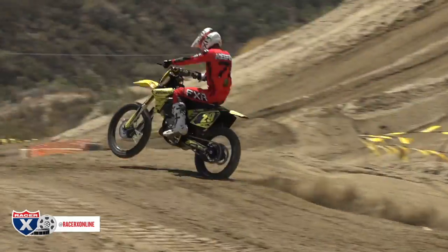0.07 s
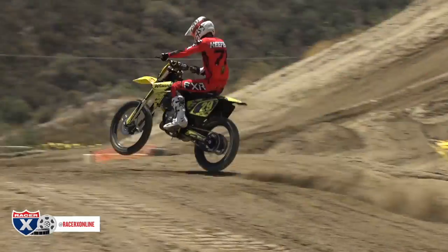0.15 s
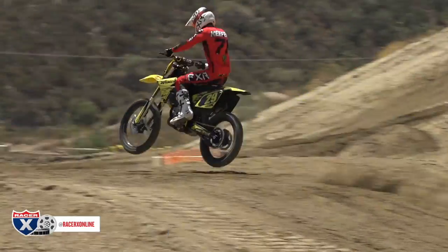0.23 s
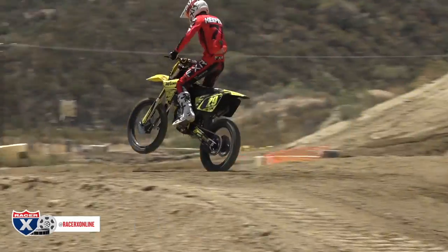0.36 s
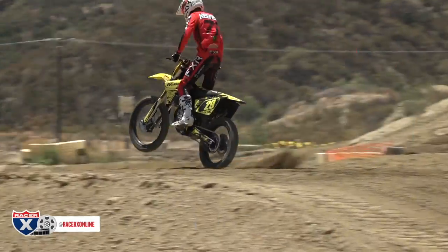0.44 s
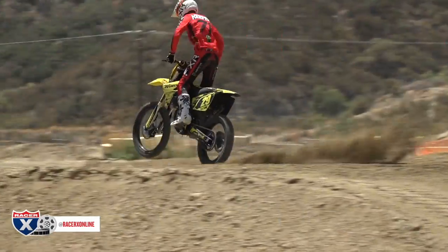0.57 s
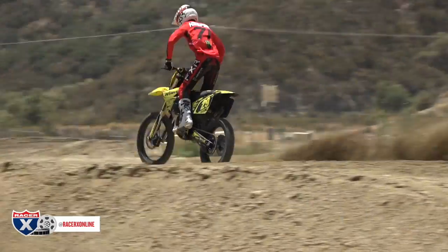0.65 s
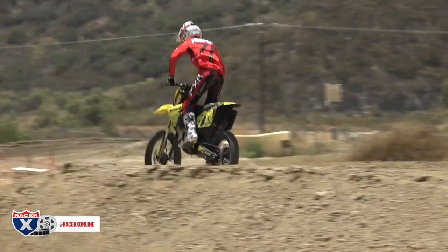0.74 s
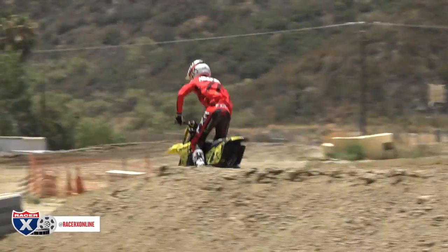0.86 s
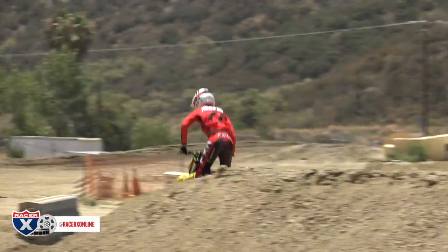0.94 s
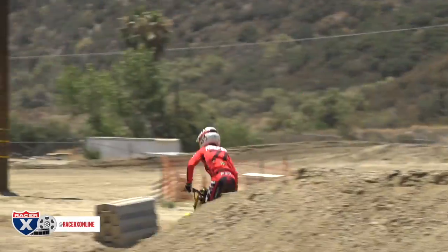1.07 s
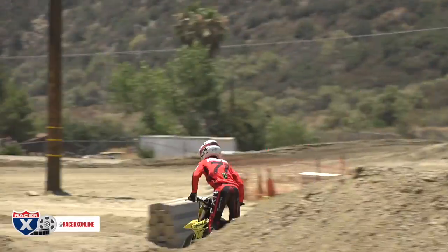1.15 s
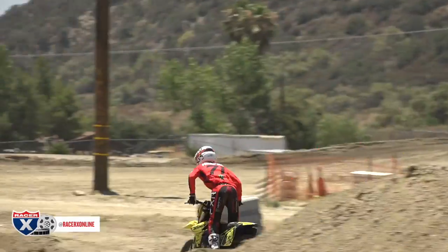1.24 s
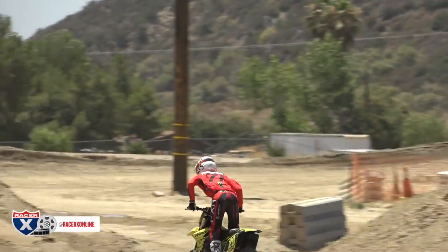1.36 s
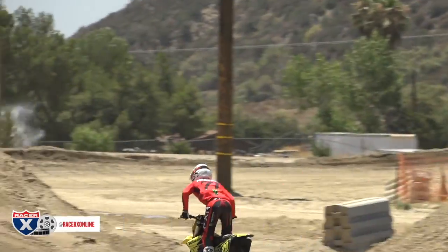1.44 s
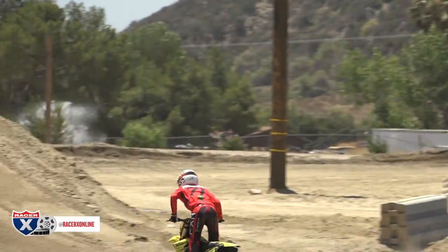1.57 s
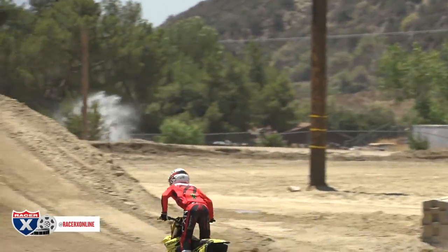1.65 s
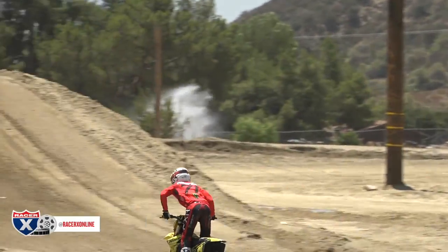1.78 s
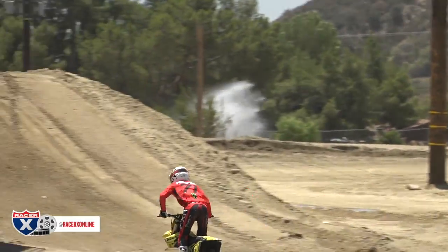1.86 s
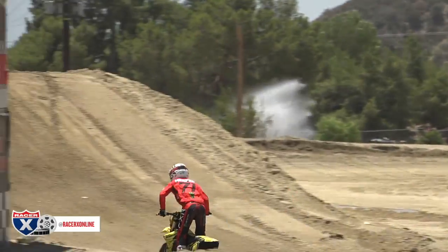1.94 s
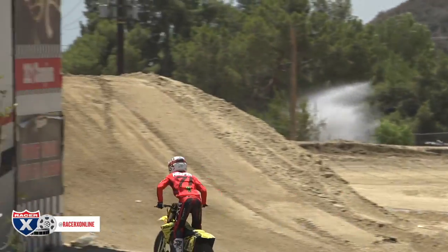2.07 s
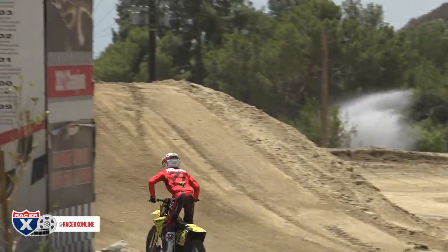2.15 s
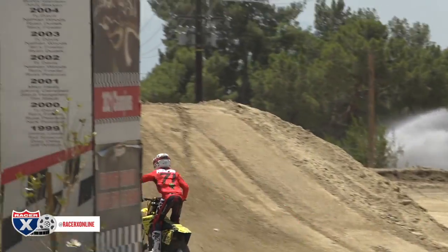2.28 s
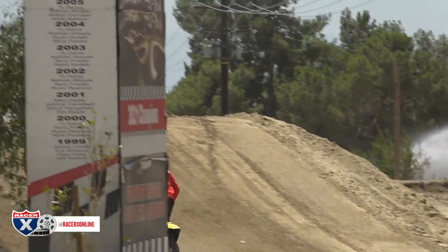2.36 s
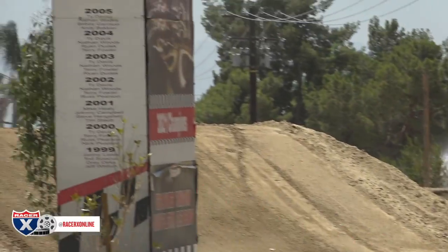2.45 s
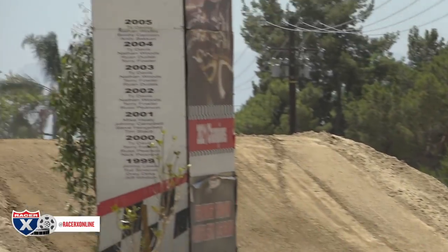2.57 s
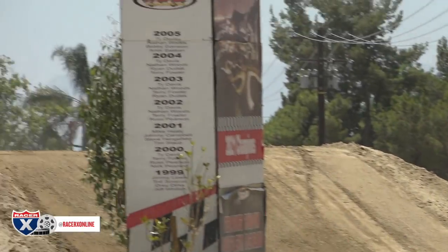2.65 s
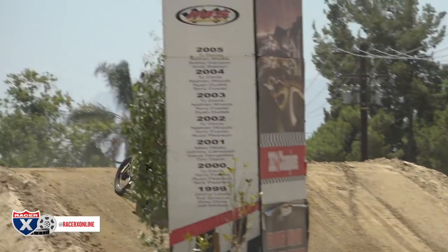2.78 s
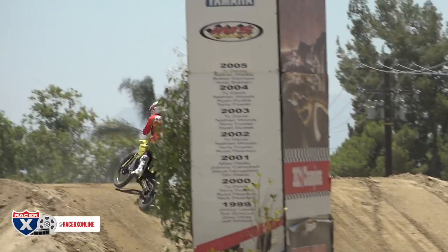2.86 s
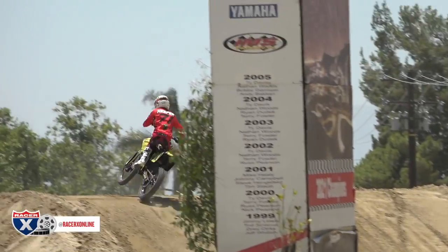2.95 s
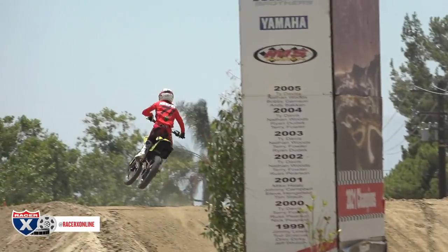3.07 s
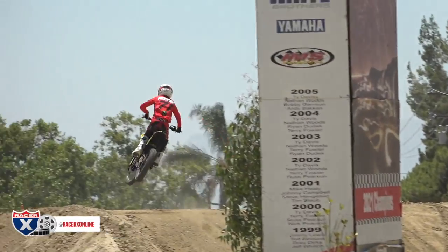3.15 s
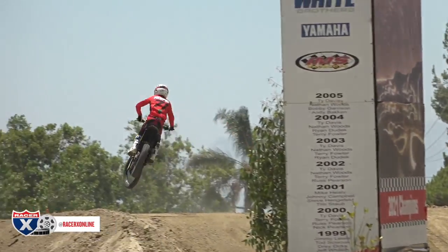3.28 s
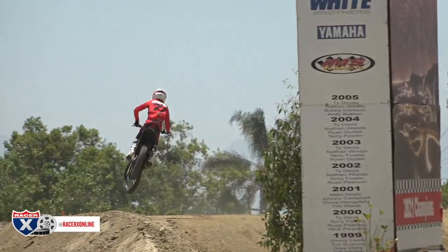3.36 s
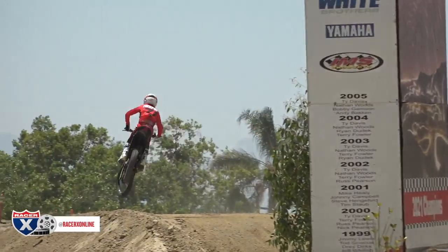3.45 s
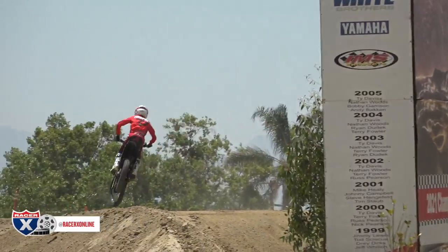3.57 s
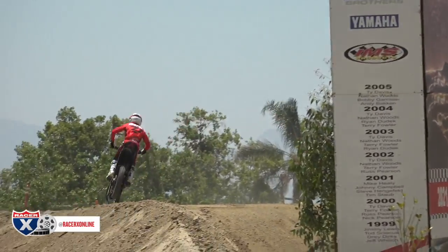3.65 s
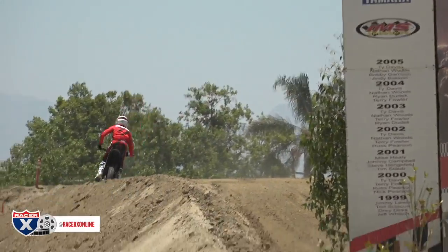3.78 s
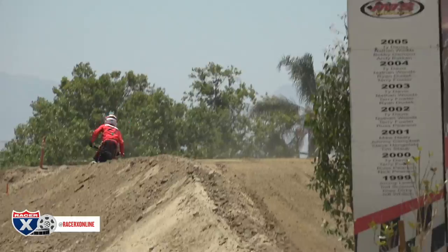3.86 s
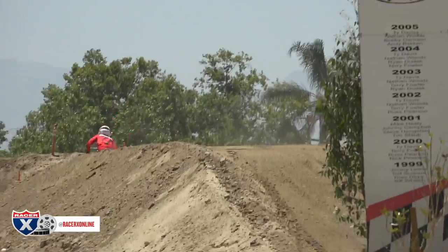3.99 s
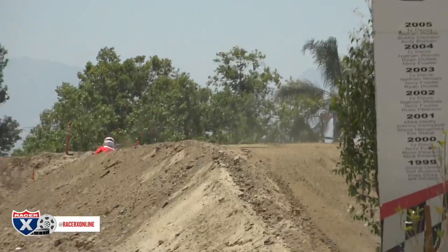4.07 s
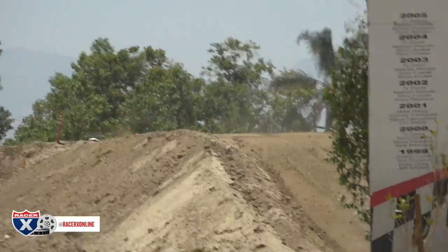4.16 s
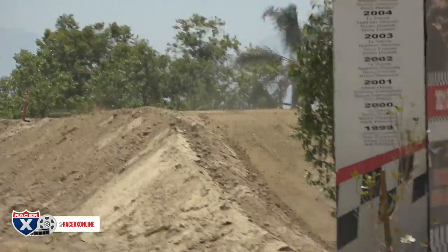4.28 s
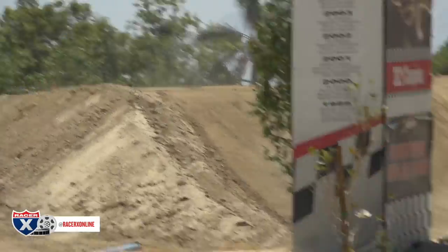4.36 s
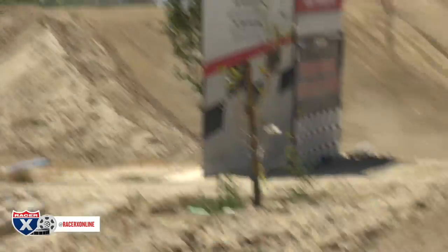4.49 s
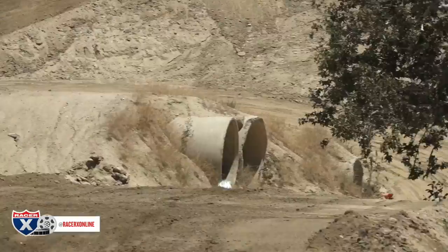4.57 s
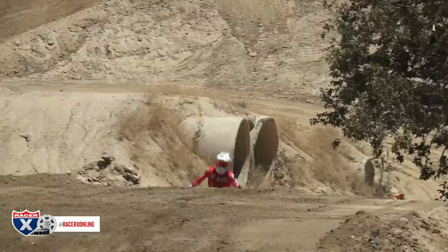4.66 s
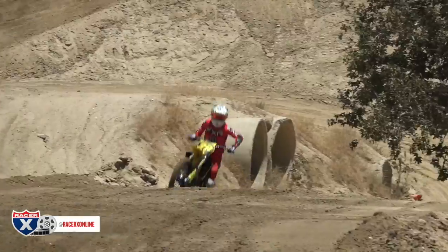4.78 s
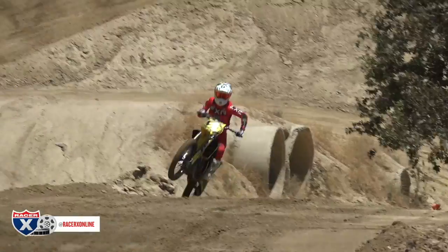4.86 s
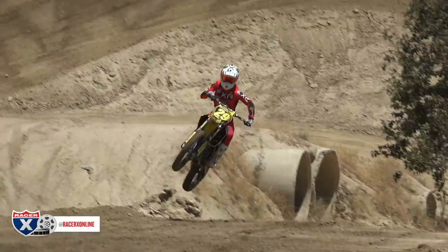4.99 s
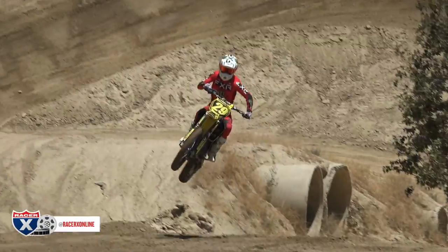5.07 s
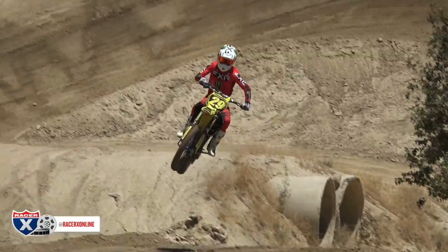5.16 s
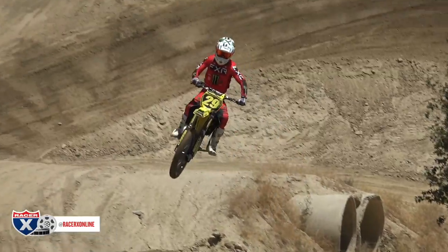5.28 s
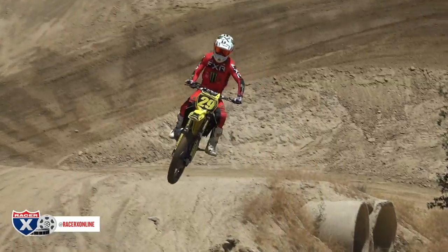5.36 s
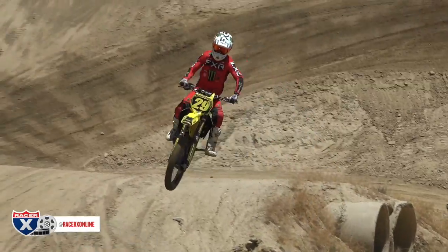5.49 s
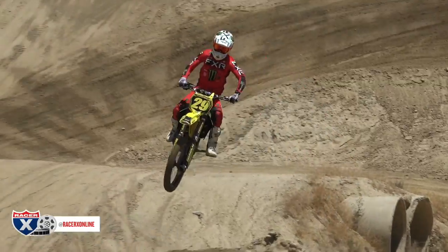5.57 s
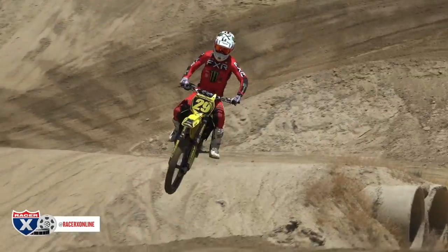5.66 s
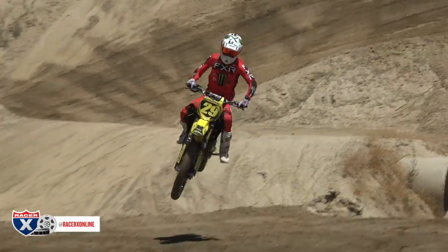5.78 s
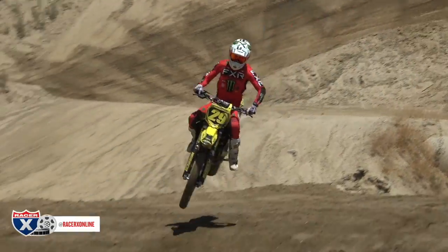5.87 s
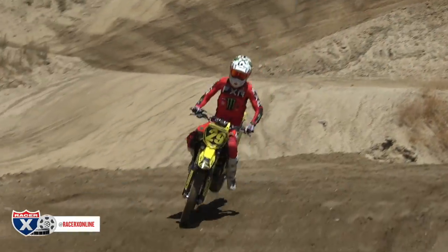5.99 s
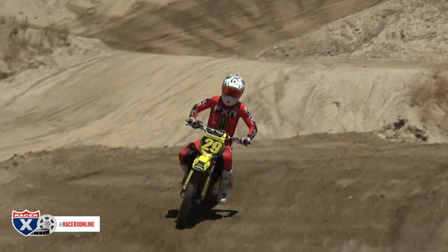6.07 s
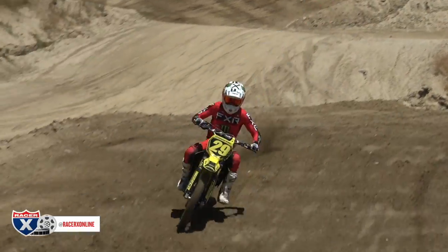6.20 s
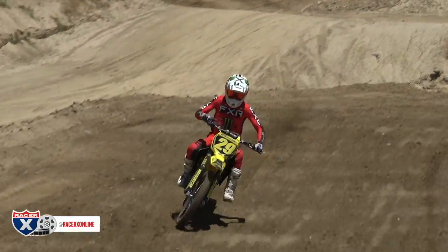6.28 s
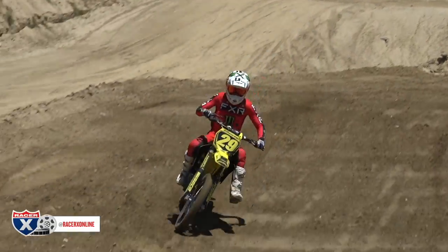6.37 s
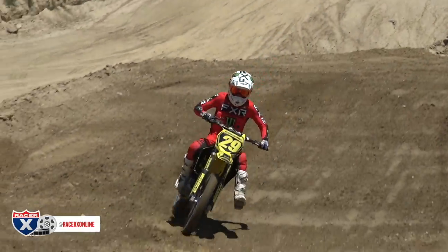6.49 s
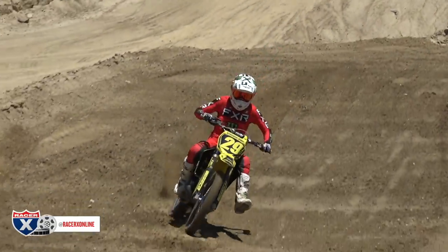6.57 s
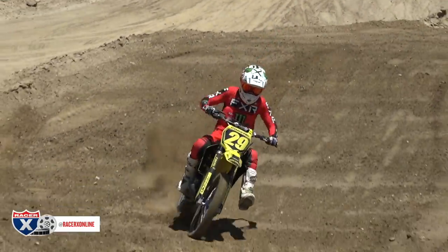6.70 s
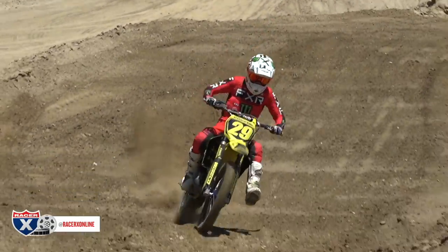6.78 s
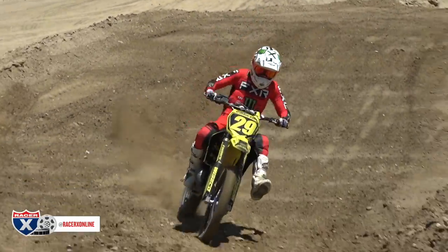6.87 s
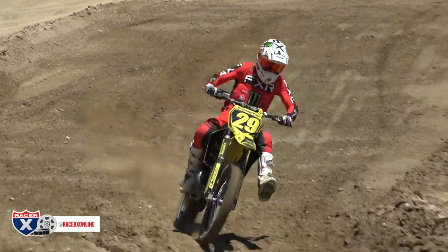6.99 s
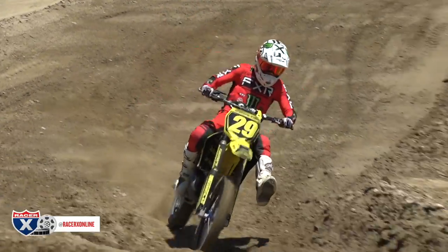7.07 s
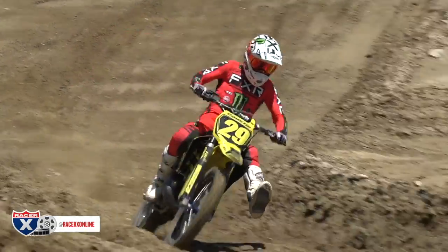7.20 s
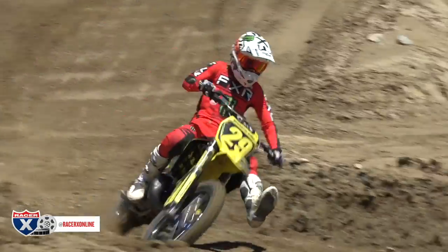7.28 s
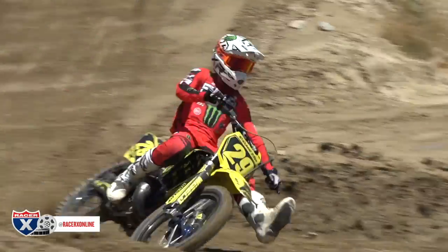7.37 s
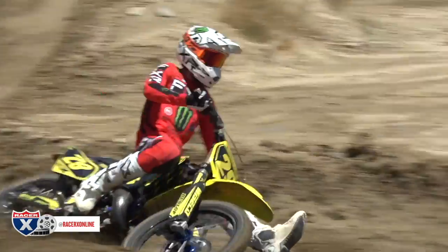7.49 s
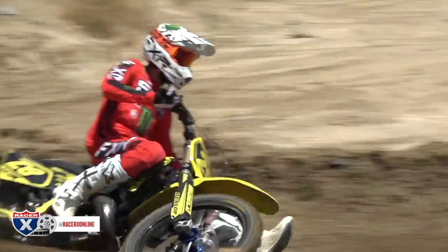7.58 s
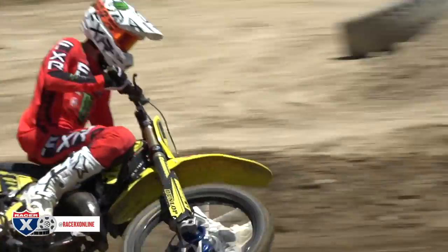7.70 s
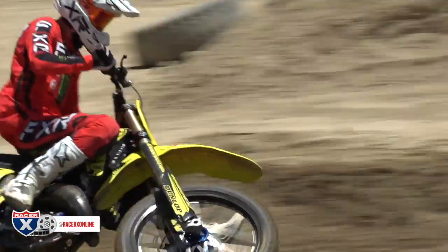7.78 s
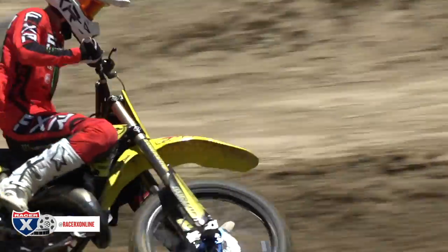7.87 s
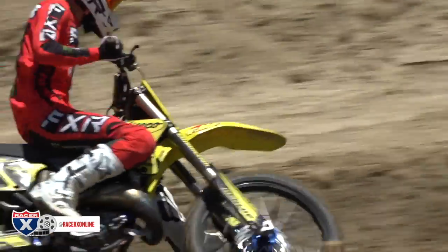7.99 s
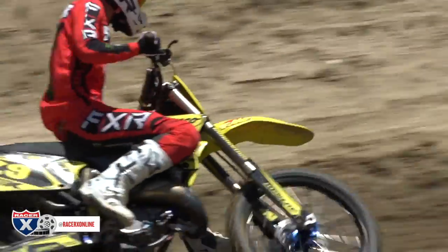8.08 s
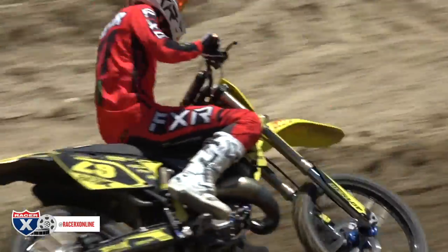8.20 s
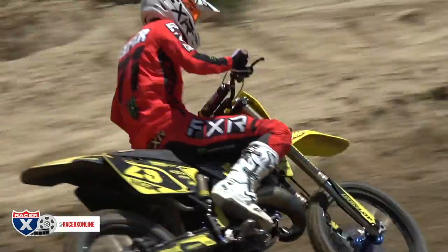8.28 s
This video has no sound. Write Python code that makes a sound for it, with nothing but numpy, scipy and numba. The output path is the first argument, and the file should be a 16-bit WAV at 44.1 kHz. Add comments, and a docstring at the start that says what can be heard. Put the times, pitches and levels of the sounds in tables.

```python
"""A two-stroke dirt bike buzzes loudly, heard from behind as it jumps away over an open track. Then, from
a second spot, it comes down into a near corner. Each firing of its one cylinder sends a thump and a sharp
crack out of the pipe: the thumps blend into a note, the cracks into a rasp. The cracks also bounce off
the ground. Cooling fins and air intake hiss, dirt banks and a hillside echo, and a light wind blows."""
import sys
import numpy as np
from scipy import signal
from scipy.io import wavfile
from scipy.ndimage import uniform_filter1d
from numba import njit

SR = 44100
rng = np.random.default_rng(int(sys.argv[2]) if len(sys.argv) > 2 else 0)


def wav_out(sig):
    """Save sig, one row per channel (or a flat mono array), as 16-bit PCM at SR to the path in sys.argv[1]."""
    wavfile.write(sys.argv[1], SR, np.round(np.clip(np.atleast_2d(sig).T, -1, 1) * 32767).astype(np.int16))


N = 367794

# The tone of the wind. Each row: frequency in Hz, relative strength in dB.
WIND_TONE = [(30, -23), (45, 8.5), (95, -1), (140, -4), (300, -12), (1400, -10)]
# Gusts on the microphone. Each row: time in seconds, boost of the low wind in dB.
GUSTS = [(0, 3), (3.2, 0), (4.5, 5.5), (4.6, -5.5), (6.3, -2), (7.7, 6), (8.2, -9)]
# Echoes off dirt banks. Each row: delay in milliseconds, gain in dB.
BANK_ECHOES = [(23, -19), (46, -21)]
# The echo off the hillside. Each row: time in seconds, delay in milliseconds, gain in dB.
HILL_ECHO = [(0, 98, -27.5), (3.5, 108, -14), (4.1, 108, -5.5), (4.56, 107, -8), (4.6, 83, -17),
             (5.5, 60, -16), (6.3, 55, -12), (7.3, 40, -18)]
# Engine speed, one list for each stretch of the ride. Each row: time in seconds, firings per second.
REVS = [
    [(0.0, 156.4), (0.08, 162.5), (0.1, 149.2), (0.13, 148.2), (0.2, 181), (0.25, 150.5), (0.33, 141.4),
     (0.39, 178.3), (0.47, 199.3), (0.52, 209.4), (0.58, 170.8), (0.66, 189.5), (0.81, 174), (0.86, 171.5),
     (0.91, 195.6), (.938, 202.7), (.956, 193), (1.05, 215.4), (1.11, 219.6), (1.16, 163), (1.21, 176.7),
     (1.345, 181), (1.37, 189.8), (1.46, 192.3), (1.5, 205.4), (1.55, 191.2), (1.64, 202), (1.75, 189.7),
     (1.92, 199)],
    [(1.97, 195.8), (2.078, 200.6), (2.268, 192.7), (2.496, 199.7), (2.548, 193.6), (2.634, 202),
     (2.688, 189.1), (2.758, 202.9), (2.798, 188.7), (2.828, 200.6), (2.914, 188), (2.946, 201.2),
     (3.004, 173.4), (3.042, 168.9), (3.2, 160)],
    [(3.25, 157.1), (3.52, 150.8), (3.61, 164.5), (3.65, 183.9), (3.71, 202), (3.85, 213.5), (4.04, 185.5),
     (4.12, 204), (4.16, 182), (4.27, 185.8), (4.4, 196.4), (4.57, 192.9)],
    [(4.58, 207.2), (4.795, 206.1), (4.825, 188.2), (4.96, 186.3), (4.99, 166.4), (5.48, 137.8),
     (5.51, 142.7), (5.6, 216), (5.64, 224.3), (5.69, 183.5), (5.72, 179.6), (5.745, 189.4), (5.78, 190),
     (5.81, 176), (6.07, 163.5), (6.105, 184.2), (6.125, 180.7), (6.18, 207), (6.2, 177), (6.232, 189),
     (6.26, 174.8), (6.33, 172.1), (6.58, 214.5), (6.63, 178.5), (6.83, 156), (6.9, 187.3), (6.97, 147.2),
     (7.03, 136.1), (7.2, 147), (7.26, 167), (7.33, 168.2), (7.42, 216.2), (7.53, 238), (7.565, 231)],
    [(7.6, 186), (7.628, 143.6), (7.652, 125.6), (7.708, 109.1), (7.858, 100.1), (7.982, 116),
     (8.088, 186.1), (8.114, 191.7), (8.192, 149), (8.302, 143.8), (8.34, 156.4)],
]
# How the bike sounds from place to place. Each row: time in seconds, rasp and note levels in dB with the
# throttle shut, overtones against the note in dB, gain above 7 kHz in dB, ground delay in milliseconds.
PLACES = [(0, -45.5, -38.5, -12.5, 1, 0.67), (1.05, -63.5, -50, -6.5, -6.5, 0.57),
          (1.13, -65, -47, -16.5, -4, 1.64), (2.7, -66, -41, -13, -2.5, 2.44),
          (3.0, -63.5, -48, -13, -2, 2.3), (3.45, -63.5, -61, -1.5, -7.5, 1.69),
          (3.95, -73, -59.5, -6, -7.5, 1.38), (4.56, -61, -13, -11.5, -9, 1.45),
          (4.58, -68, -63, -25.5, -33, 0.39), (5.0, -63.5, -60.5, -4.5, -2, 0.33),
          (5.2, -52.5, -63.5, 4, -0.5, 0.45), (5.45, -55, -53.5, -11, 0, 0.44),
          (5.75, -51.5, -48, -6, -2.5, 0.612), (6.63, -46, -40.5, -16, 3, 0.67),
          (6.96, -44.5, -48, -8, -0.5, 0.88), (7.25, -40.5, -42, -9.5, 4.5, 1.03),
          (7.8, -36.5, -33.5, -11.5, 1.5, 0.98), (8.04, -37, -33, -3.5, 2, 1.18),
          (8.34, -40, -31, -5, 4, 1.36)]
# Twists of the throttle. Each row: start and end in seconds, base levels of rasp and note in dB,
# swell over the twist in dB (rasp and note each take a share of it).
TWISTS = [(0, 0.219, -34.5, -34.5, 5.5), (0.338, 0.53, -30, -32.5, -14.5), (0.528, 0.6, -37.5, -39.5, 12),
          (0.593, 0.701, -36.5, -37, 3), (0.845, 1.056, -40.5, -38, -19.5), (1.14, 1.47, -55, -39.5, -8),
          (1.438, 2.15, -57.5, -42, -2), (2.108, 2.4, -66, -44.5, 3.5), (2.366, 2.659, -56.5, -41, -13),
          (2.714, 2.885, -62, -43.5, 3.5), (3.549, 3.8, -53, -49, 8), (3.761, 3.87, -52, -52, -19),
          (4.038, 4.28, -63, -48, -2), (4.241, 4.565, -66, -50, -11), (4.576, 4.805, -65, -55.5, -1),
          (5.501, 5.675, -43.5, -42, -16.5), (6.075, 6.24, -43, -36.5, 0.5),
          (6.214, 6.603, -37, -36.5, -3.5), (6.671, 6.923, -35, -38.5, -4),
          (7.194, 7.231, -30.5, -39.5, -4), (7.245, 7.285, -36, -38, 1.5), (7.325, 7.65, -34.5, -35.5, -9),
          (7.582, 7.765, -25.5, -31.5, -3), (7.861, 8.08, -27, -33.5, 1), (8.038, 8.343, -24, -25.5, 3.5)]
# How far the tail pipe faces us. Each row: time in seconds, the cracks' share of the rasp from 0 to 1.
FACING = [(0, .8), (2.85, .74), (3.0, .35), (3.5, .45), (3.65, .7), (4.25, .6), (4.36, .82), (4.56, .82),
          (4.58, .3), (5.2, .15), (6.0, .25), (7.3, .25), (7.4, .6), (7.54, .7), (7.58, .3), (7.65, .4),
          (7.8, .2), (8.0, .3), (8.12, .72)]
# Late firings off the throttle. Each row: start in seconds, count, base level in dB, step per pop in dB.
POPS = [(3.2658, 1, -40, 0), (3.2853, 3, -35, -2), (3.3824, 2, -46, 4), (3.4502, 4, -43, 1)]
# Ragged burns. Each row: start and end in seconds, level in dB, centre and width in Hz.
RAGGED_BURNS = [(7.57, 7.635, -31, 3150, 4505)]
# Resonances (frequencies that ring) of the tail pipe. Each row: centre and width in Hz, gain in dB.
TAIL_PIPE = [(3230, 2900, 5), (4960, 3020, 15.5), (7020, 7600, 15.5)]
# Resonances of the exhaust chamber's walls. Each row: centre and width in Hz, gain in dB.
CHAMBER_WALLS = [(2680, 200, -1), (3250, 130, 2.5), (3950, 300, -6)]
# The hiss of fins and intake. Each row: centre and width in Hz, gain in dB.
HISS_BANDS = [(2870, 4300, -19.5), (3590, 560, -12), (4230, 390, -11.5), (5750, 1050, -9.5),
              (7540, 4800, -13.5), (9330, 860, -13), (14300, 23000, -33)]
# The snarl, a broad boost that moves as the pipe swings.
# Each row: time in seconds, centre and width in Hz, boost in dB.
SNARL = [(0, 3560, 2570, 10), (.4, 3320, 3080, 7.5), (.62, 3177, 3000, 6.5), (1.5, 2788, 3017, 7.5),
         (2.6, 3073, 2491, 13), (2.9, 3008, 3015, 5.5), (3.5, 2605, 2489, 9.5), (3.75, 3262, 2980, 1.5),
         (4.3, 2798, 2495, 13), (4.44, 2900, 905, 22.5), (4.56, 2784, 1197, 18), (4.6, 3000, 2497, 3.5),
         (6.7, 3207, 2997, 0), (7.45, 3200, 2522, 0), (7.62, 3200, 2503, 4.5), (8.0, 3202, 2998, 3.5),
         (8.2, 3216, 3000, 10.5)]
# Resonances of pipe and silencer. Each row: centre and width in Hz, gain in dB from the front,
# gain in dB from behind, change in dB when the bike is alongside.
PIPE_RESONANCES = [(437, 289, -7.5, -10, -0.5), (572.6, 127, -9, 4.5, -39), (919.4, 107, -5.5, -20.5, 20),
                   (1250, 330, -6.5, 2, -11.5), (2180, 1030, -21.5, 4.5, -4.5)]
# Low harmonics (multiples of the firing rate) that ground and banks favour. Each row: time in seconds,
# an added second harmonic in dB against the first, boosts of the third and of the fourth in dB.
LOW_HARMONICS = [(0, -10, -2.5, -7), (.5, -14, 1.5, 5.5), (.8, -19, 0.5, -4), (1.1, -9.5, 11, 8),
                 (1.5, -10.5, 5, 2), (2.2, -11, 8.5, 0), (2.5, -11, -2, -9), (2.8, -17, -4, 4),
                 (3.0, -27, -15, -3.5), (3.5, -26, -5, 0), (4.1, -15, 5.5, 8), (4.3, -13, -6, 12.5),
                 (4.56, -9, -4, 11.5), (4.7, -14, 11.5, 11.5), (5.2, 1, -12, 2), (5.6, -17, 6.5, 1.5),
                 (6.0, -44, -6.5, 5), (6.5, -17.5, 5.5, -6.5), (7.2, -30, -10.5, -6), (7.5, -5.5, 3, 5.5),
                 (7.85, 5, 12, 3), (8.15, -17, 0.5, 8.5)]

TIME = np.arange(N) / SR


def undb(db):
    """Turn decibels into a factor to multiply by."""
    return 10 ** (np.asarray(db) / 20)


def curves(table):
    """Join a table's rows with straight lines: one curve for each column after the time."""
    times, *columns = np.vstack(table).T
    return [np.interp(TIME, np.maximum.accumulate(times), column) for column in columns]


def even(x, span_s=0.037):
    """Hold a sound's running average level at 1."""
    span = int(span_s * SR)
    return x / np.sqrt(uniform_filter1d(uniform_filter1d(x ** 2, span), span) + 1e-18)


@njit
def sweep(x, hz, width):
    """Keep the frequencies near a moving centre, sample by sample (a state-variable filter)."""
    out, band_state, low_state = np.empty(len(x)), 0., 0.
    for i in range(len(x)):
        tuning, damping = np.tan(np.pi * hz[i] / SR), width[i] / hz[i]
        band = (band_state + tuning * (x[i] - low_state)) / (1 + tuning * (tuning + damping))
        band_state = 2 * band - band_state
        low_state += 2 * tuning * band
        out[i] = damping * band
    return out


def band_pass(x, hz, width):
    """Keep one band of frequencies; its centre and width may be steady or moving."""
    return sweep(x, hz + np.zeros(N), width + np.zeros(N))


def wander(rate):
    """A smooth random curve, roughly -1 to 1, with `rate` new values a second."""
    hold = int(SR / rate)
    steps = np.repeat(rng.standard_normal(N // hold + 1), hold)
    return 1.3 * uniform_filter1d(uniform_filter1d(steps, hold), hold)[:N]


def ring(x, resonances, drift, waver_db, steep=True):
    """Pass a sound through resonances whose pitch drifts and whose level wavers."""
    out = 0
    for hz, width, db in resonances:
        centre = hz * (1 + drift * wander(4))
        band = band_pass(x, centre, width)
        if steep:
            band = band_pass(band, centre, 1.5 * width)
        out += undb(db + waver_db * wander(7.7)) * band
    return out


def wind(base_db=-62):
    """Moving air: bands of noise swell together and flicker alone; gusts lift the low ones."""
    tone_hz, tone_db = np.array(WIND_TONE).T
    gust_db, = curves(GUSTS)
    low, high, swell = 0, 0, wander(2.72)
    for hz in 30 * 2 ** np.arange(0, 5.6, .5):
        db = np.interp(np.log(hz), np.log(tone_hz), tone_db) + .5 * swell
        band = ring(rng.standard_normal(N), [(hz, hz / 2, db)], drift=.012, waver_db=3)
        if hz < 200:
            low += band
        else:
            high += band
    return undb(base_db) * (undb(gust_db) * low + high) / (low + high).std()


def delayed(x, ms):
    """The same sound, some milliseconds later."""
    return np.interp(TIME - ms / 1000, TIME, x, left=0)


def echo(x, delay_ms, db):
    """Sound thrown back by a slope; its level and delay drift as the bike moves."""
    return undb(db + 2 * wander(9)) * delayed(x, delay_ms + .5 * wander(2))


def thud(start_s=7.55, db=-40, hz=101.4, fade_s=.031):
    """The frame bottoms out in a rut: one low bump that dies away."""
    age = np.maximum(TIME - start_s, 0)
    return undb(db) * np.sin(2 * np.pi * hz * age) * np.exp(-age / fade_s)


def pops(gap_s=.0064, fade_s=.006):
    """Late firings, a crank turn apart: a crack and a puff through the silencer, and off the ground."""
    out, age = np.zeros(N), np.arange(int(.03 * SR)) / SR
    crack = -2 * (age == 0)
    for start_s, count, db, step_db in POPS:
        for k in range(count):
            at = int((start_s + k * gap_s) * SR)
            puff = undb(-14) * np.exp(-age / fade_s) * rng.standard_normal(len(age))
            out[at:at + len(age)] += undb(db + k * step_db) * (puff + crack)
    out += .67 * delayed(out, ms=1.05)
    silencer = [(623, 203, 14.4), (1260, 410, 15.5), (2900, 2000, 10.7), (4860, 1900, 2.2)]
    return ring(out, silencer, drift=0, waver_db=-2)


def ragged_burns(turns):
    """Gas noise puffs through the pipe once a turn while the fuel burns unevenly."""
    puffs = np.exp(-(turns % 1) / .4) * rng.standard_normal(N)
    out = 0
    for start, end, db, hz, width in RAGGED_BURNS:
        fade = np.interp(TIME, [start, start + .025, end - .02, end], [0, 1, 1, 0])
        out += undb(db) * fade * even(ring(puffs, [(hz, width, 0)], drift=.05, waver_db=0))
    return out


def alongside(start_s=8.05, rise_s=.057):
    """Goes from 0 to 1 as the bike draws level with the microphone."""
    return np.clip((TIME - start_s) / rise_s, 0, 1)


def throttle(when_shut, when_open, swell_share, smooth_s=.021):
    """A curve that moves from its shut value to each twist's own value and back."""
    out, last_end, blend = np.array(when_shut), -1, int(.03 * SR)
    next_starts = [twist[0] for twist in TWISTS[1:]] + [N / SR]
    for (start_s, end_s, _, _, swell_db), value, next_s in zip(TWISTS, when_open, next_starts):
        if next_s - end_s < .015:  # close or overlapping twists run together
            end_s = next_s
        start, end = int(start_s * SR), int(end_s * SR)
        out[start:end] = value + swell_share * swell_db * np.linspace(0, 1, end - start)
        if start == last_end:
            out[start:start + blend] = np.linspace(out[start - 1], out[start + blend], blend)
        last_end = end
    return uniform_filter1d(out, int(smooth_s * SR), mode="nearest")


def firings(turns, scatter_ms, size_spread_db=1.2):
    """One click per crank turn, each a little early or late and of its own size."""
    whole_turns = np.arange(1, int(turns[-1]))
    time_luck, size_luck = rng.standard_normal((N // 100, 2))[:len(whole_turns)].T
    on_time = np.interp(whole_turns, turns, np.arange(N))
    at = np.clip(on_time + scatter_ms[on_time.astype(int)] * SR / 1000 * time_luck, 0, N - 2)
    size = undb(size_spread_db * size_luck)
    out, sample = np.zeros(N), at.astype(int)
    np.add.at(out, sample, size * (1 - at + sample))  # two neighbouring samples share each click
    np.add.at(out, sample + 1, size * (at - sample))
    return out


def cracks(turns, air_db, ground_ms):
    """Each firing cracks out of the tail pipe, bounces off the dirt and rings the chamber walls."""
    scatter_ms = .007 + .0012 * np.clip(-air_db, 0, 7)  # more air, looser timing
    clicks = firings(turns, scatter_ms)
    loose_clicks = firings(turns, 3 * scatter_ms)  # for the highest band
    pipe = ring(clicks, TAIL_PIPE[:-1], drift=.025, waver_db=1.5)
    pipe += ring(loose_clicks, TAIL_PIPE[-1:], drift=.025, waver_db=1.5)
    bounce = delayed(pipe, ground_ms + .05 * wander(5))
    pipe += .5 * undb(2.5 * wander(25)) * bounce  # rough dirt makes the bounce flicker
    walls = ring(clicks, CHAMBER_WALLS, drift=.015, waver_db=2.5 - 1.5 * alongside(), steep=False)
    return even(even(pipe) + undb(-7 + 9 * alongside()) * even(walls))


def hiss(turns):
    """Fins and intake hiss with gas noise that swells once a turn."""
    swell = 2.5 + np.exp(-(turns % 1) / .5)
    bands = [ring(swell * rng.standard_normal(N), [row], drift=.027, waver_db=0) for row in HISS_BANDS]
    return even(sum(bands))


def through_air(x, air_db):
    """Warm air makes narrow bands come and go; then air_db turns the highest sounds down or up."""
    out, depth_db = x.copy(), 2.4 * (1 - alongside() / 2)
    for hz in 2000 * 2 ** np.arange(0, 2.1, .2):
        out += (undb(depth_db * wander(16)) - 1) * band_pass(x, hz, hz / 7)
    for edge_hz, weight in ((7000, 1), (10500, 1.5)):
        low = signal.sosfilt(signal.butter(3, edge_hz, fs=SR, output="sos"), out)
        high = signal.sosfilt(signal.butter(3, edge_hz, "high", fs=SR, output="sos"), out)
        out = low + undb(weight * air_db) * high
    return out


def rasp(turns, level_db, air_db, ground_ms):
    """The bike's treble: mostly cracks when the pipe faces us, mostly hiss when it points away."""
    facing, = curves(FACING)
    snarl_hz, snarl_width, snarl_db = curves(SNARL)
    out = np.sqrt(facing) * cracks(turns, air_db, ground_ms) + np.sqrt(1 - facing) * hiss(turns)
    out += (undb(snarl_db) - 1) * band_pass(out, snarl_hz, snarl_width)
    return through_air(out, air_db) * undb(level_db + 1.3 * wander(11))  # flutters over the bumps


def exhaust_note(hz, turns, note_db, overtone_db, shut):
    """The pipe's thumps make a tone at the firing rate, with overtones shaped by its resonances."""
    harmonics = np.arange(2, 19)
    facing, = curves(FACING)
    second_db, *boosts_db = curves(LOW_HARMONICS)
    gains, beside = 0, alongside()
    for rank, (centre, width, front_db, rear_db, side_db) in enumerate(PIPE_RESONANCES):
        db = front_db + (rear_db - front_db) * facing + side_db * beside
        db -= 1.5 * rank * shut  # a shut throttle dulls the higher resonances
        shape = 1 / (1 + (2 * (harmonics[:, None] * hz - centre) / width) ** 2)
        gains += undb(overtone_db + db) * shape / np.linalg.norm(shape, axis=0)
    gains[0] += undb(note_db + second_db)
    gains[1:3] *= undb(boosts_db)
    phase = 2 * np.pi * turns
    out = -undb(note_db + .7 * wander(25)) * np.cos(phase)
    for k, gain in zip(harmonics, gains):
        blur = .055 * k * wander(70)  # uneven burns blur the higher harmonics more
        waver = wander(15)
        waver_db = (min(1 + .5 * k, 3) - 2 * beside) * waver
        # a quick flicker, heard from the front
        sputter_db = 4.5 * (1 - facing) * (1 - beside) * min(k / 4 - .2, 1) * wander(38)
        out -= gain * undb(sputter_db + waver_db) * np.cos(k * (phase + .1) + blur + .8 * waver)
    return np.sqrt(2) * out


def engine():
    """One cylinder fires once per crank turn; throttle, revs and place set how loud it is."""
    hz, = curves(REVS)
    hz *= 1 + .005 * wander(16)  # the rear wheel grips and slips
    turns = np.cumsum(hz) / SR
    shut_rasp_db, shut_note_db, overtone_db, air_db, ground_ms = curves(PLACES)
    _, _, open_rasp_db, open_note_db, _ = zip(*TWISTS)
    rasp_db = throttle(shut_rasp_db, open_rasp_db, swell_share=.7, smooth_s=.0015)
    note_db = throttle(shut_note_db, open_note_db, swell_share=.4)
    shut = throttle(np.ones(N), np.zeros(len(TWISTS)), swell_share=0)
    tuned_hz = 190  # louder above this firing rate, quieter below
    rasp_db += .1526 * (hz - tuned_hz)
    rev_db = .32 * (np.clip(hz, 167, 218) - tuned_hz)
    note = exhaust_note(hz, turns, note_db + rev_db, note_db + overtone_db, shut)
    return note + rasp(turns, rasp_db, air_db, ground_ms) + ragged_burns(turns) + pops()


def scene():
    """The bike, its dull echoes and the wind, the same in both channels."""
    bike = engine() + thud()
    dull = band_pass(bike, hz=1500, width=6000)
    echoes = sum(echo(dull, delay_ms, db) for delay_ms, db in BANK_ECHOES + [curves(HILL_ECHO)])
    return np.tile(bike + echoes + wind(), (2, 1))


def record(dry, ceiling=.45, top_hz=15550):
    """Round off the sharpest peaks and cut the very highest sounds."""
    rounded = ceiling * np.tanh(dry / ceiling)
    return signal.sosfilt(signal.ellip(10, .2, 60, top_hz, fs=SR, output="sos"), rounded)


dry = scene()
out = record(dry)
wav_out(out)
```